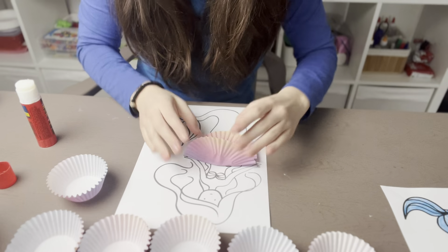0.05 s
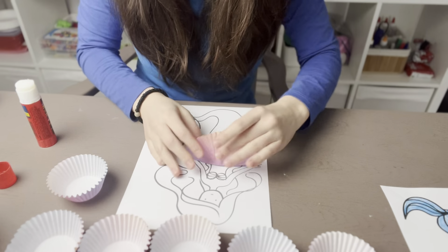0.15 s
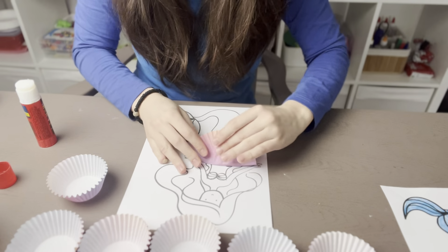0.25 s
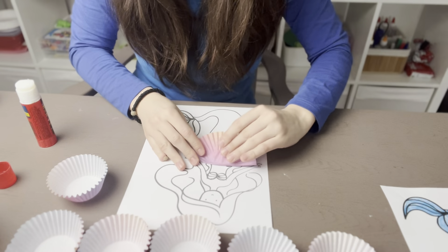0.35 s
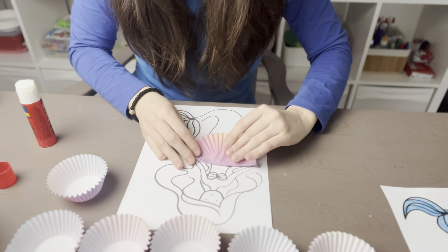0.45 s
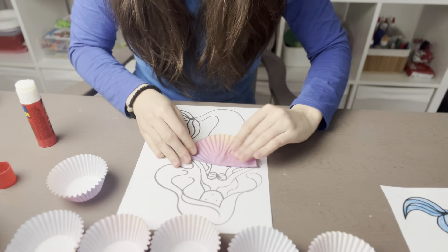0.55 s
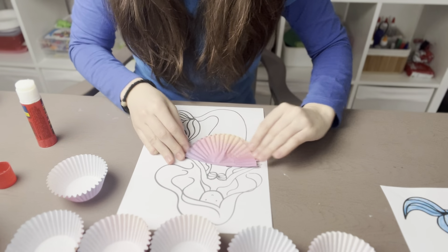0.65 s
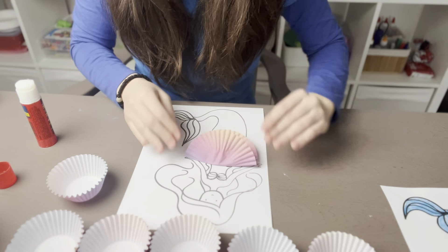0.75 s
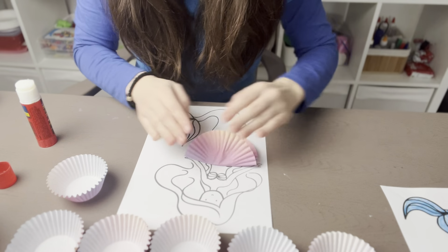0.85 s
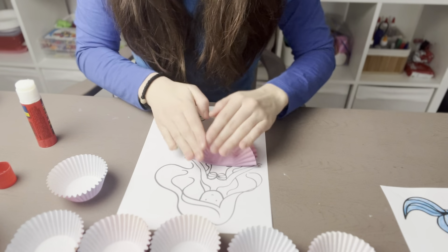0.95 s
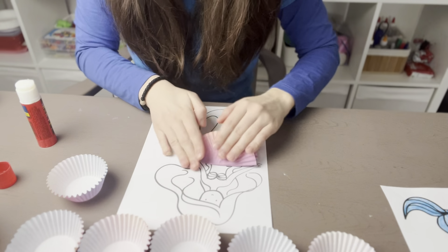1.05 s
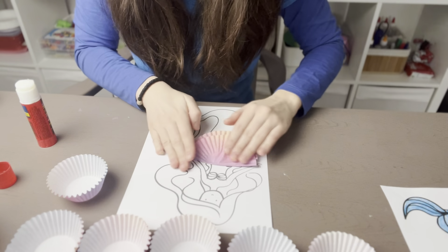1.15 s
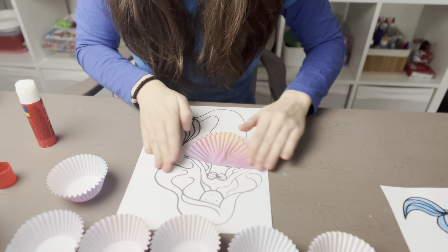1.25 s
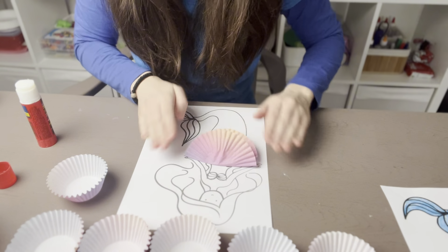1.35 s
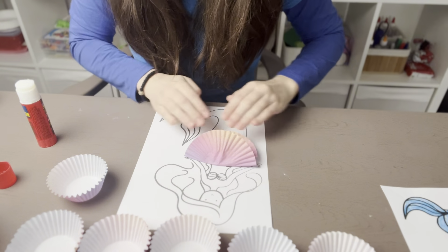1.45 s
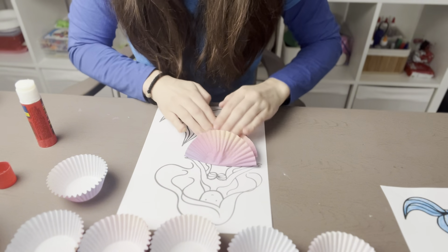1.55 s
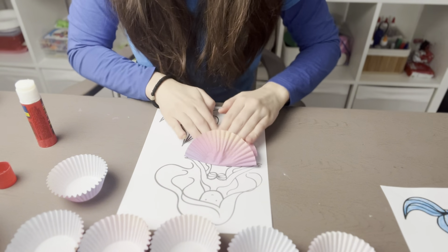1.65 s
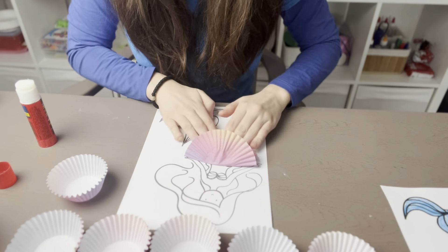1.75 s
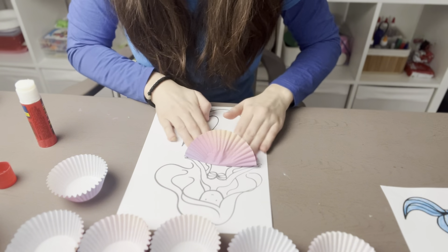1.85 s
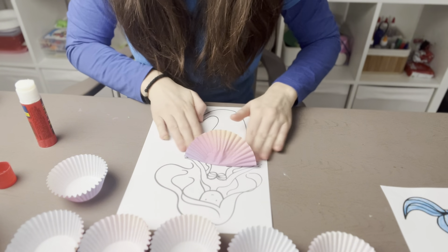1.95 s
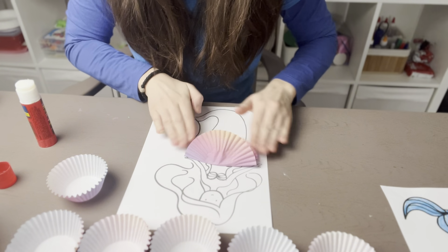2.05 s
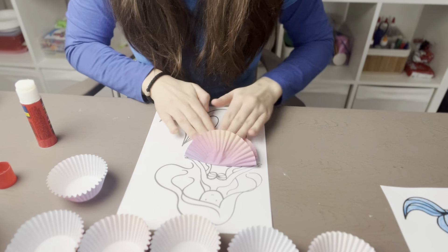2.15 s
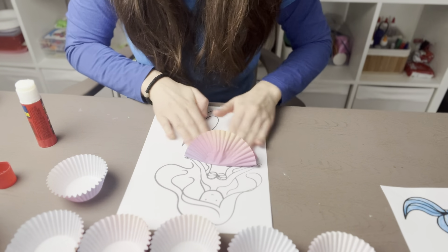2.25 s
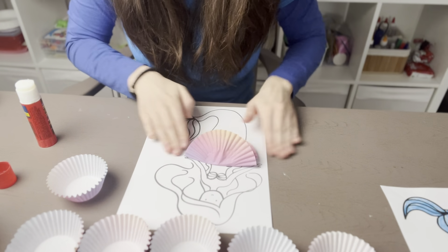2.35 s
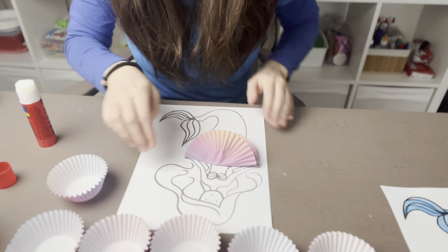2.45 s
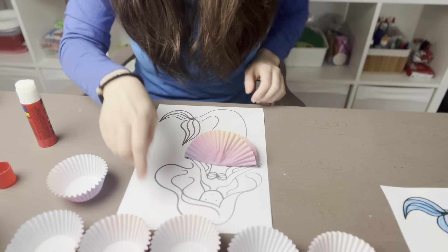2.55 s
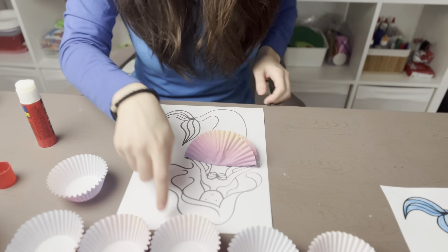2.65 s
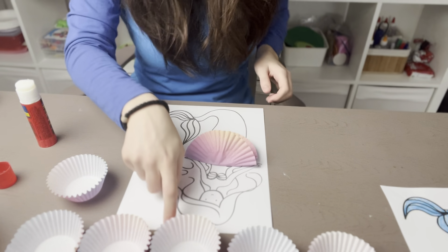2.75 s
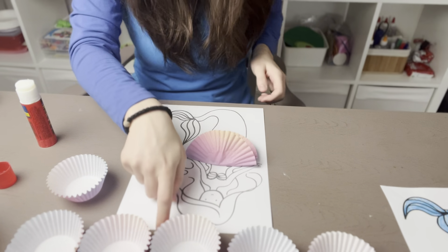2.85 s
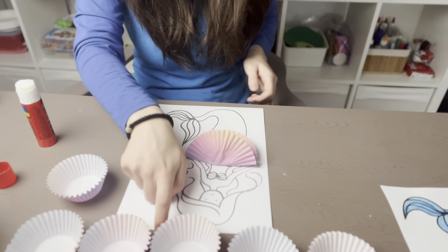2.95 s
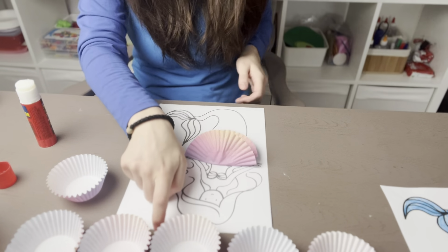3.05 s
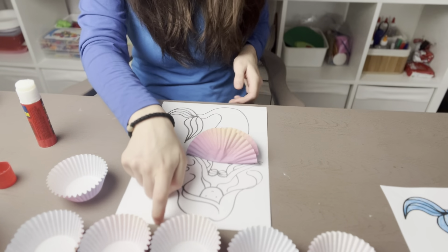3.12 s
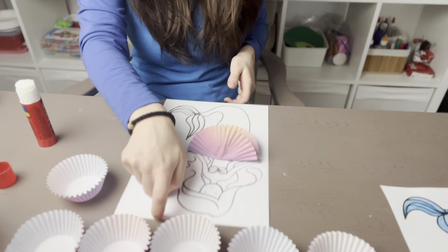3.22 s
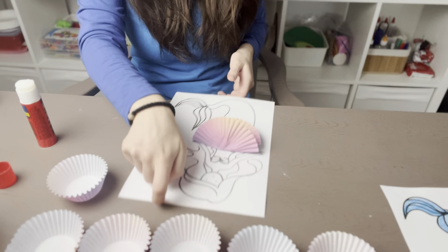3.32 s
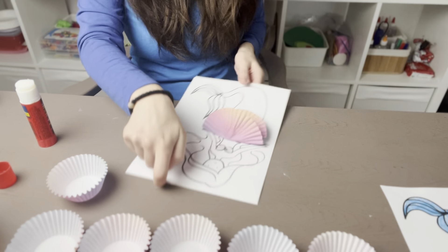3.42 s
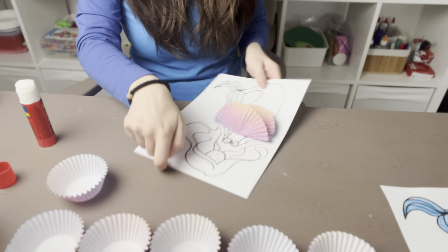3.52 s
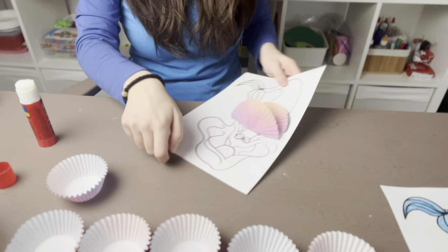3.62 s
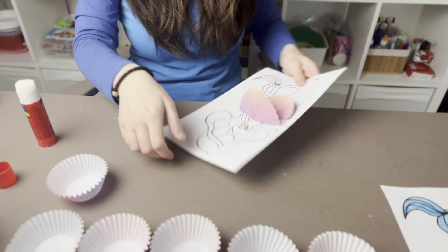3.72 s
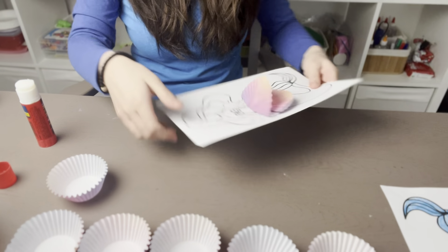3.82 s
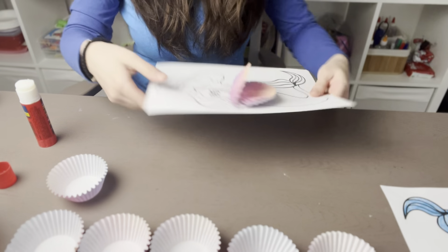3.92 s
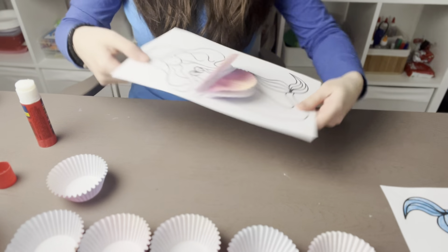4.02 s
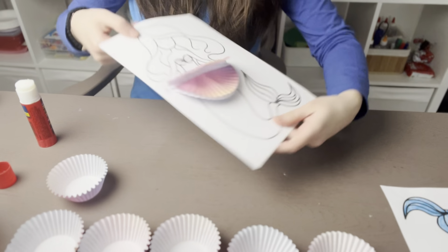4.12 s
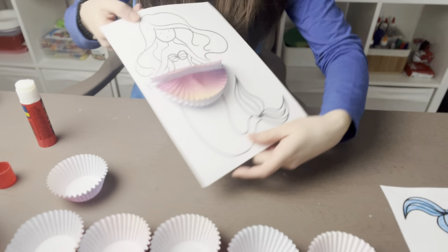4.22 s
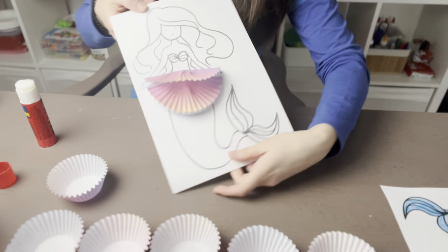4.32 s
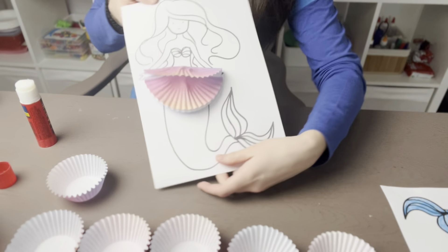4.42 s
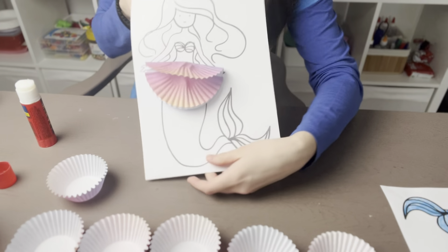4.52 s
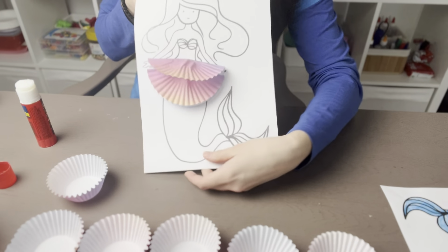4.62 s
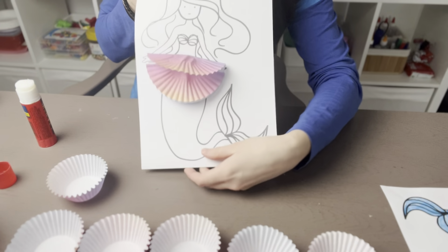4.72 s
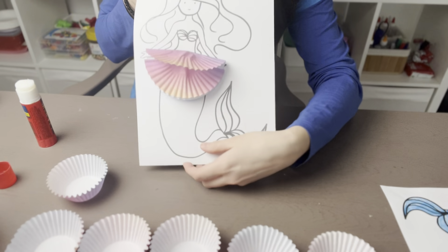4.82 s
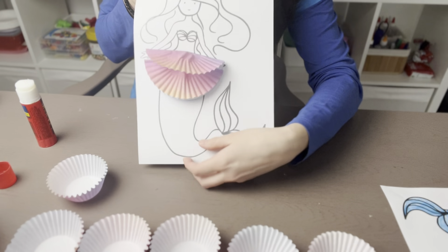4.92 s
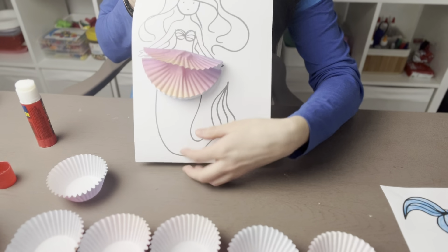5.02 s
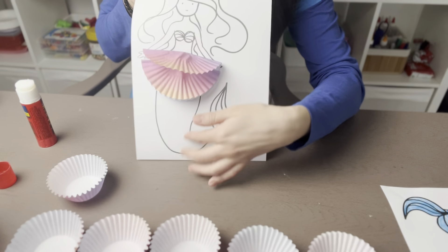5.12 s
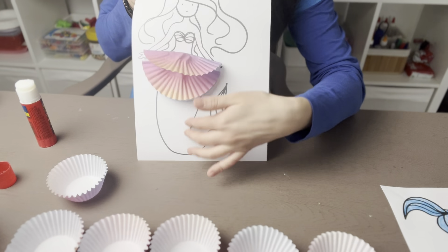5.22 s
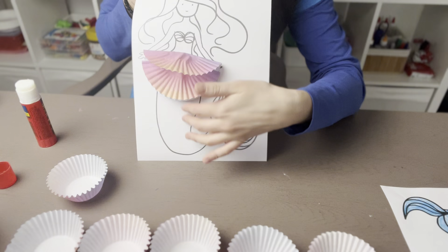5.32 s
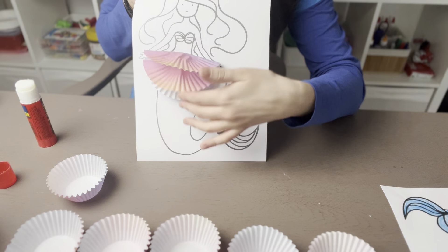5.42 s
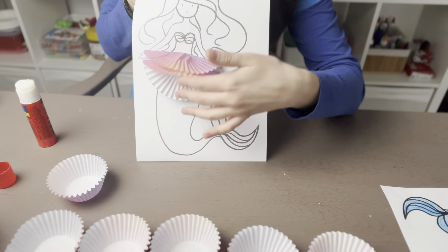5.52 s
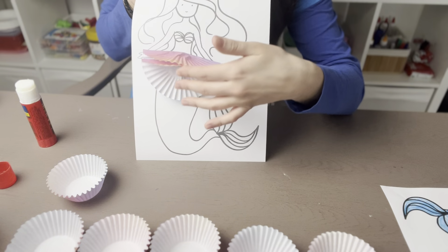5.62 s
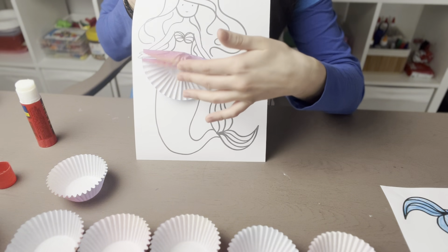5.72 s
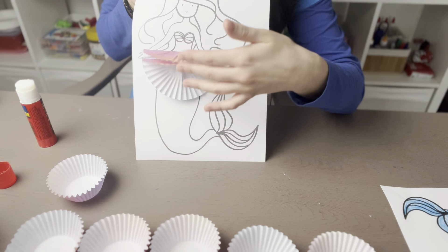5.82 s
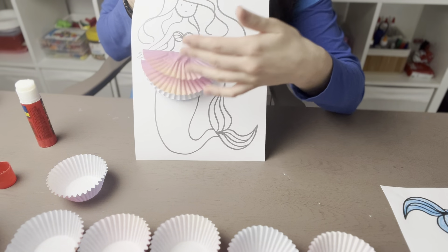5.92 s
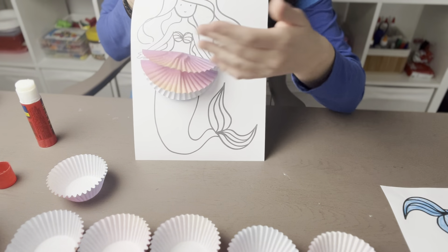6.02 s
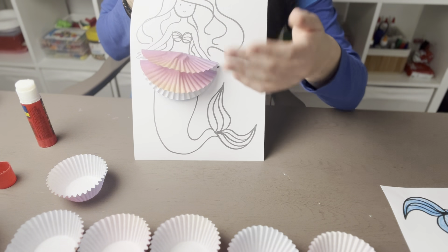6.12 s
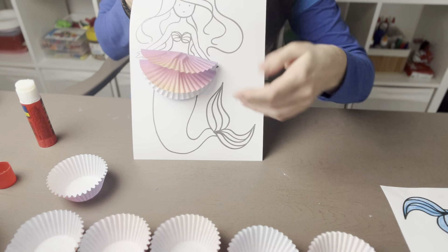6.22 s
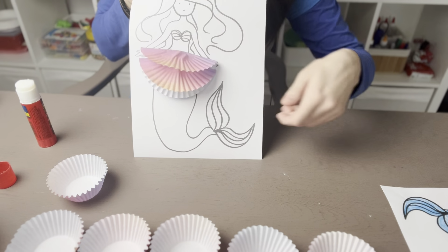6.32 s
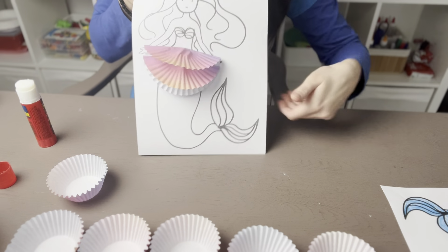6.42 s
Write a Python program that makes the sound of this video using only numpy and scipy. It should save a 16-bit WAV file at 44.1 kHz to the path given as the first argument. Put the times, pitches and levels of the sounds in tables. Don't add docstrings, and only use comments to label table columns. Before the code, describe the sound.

Crisp paper crackling under working fingers in a quiet room, a dull scrape over wood, faint flutter, one loud knock, then a few light rubs.

```python
import sys
import numpy as np
from scipy import signal
from scipy.fft import rfft, irfft, next_fast_len
from scipy.io import wavfile
from scipy.ndimage import uniform_filter1d, map_coordinates

SR = 44100
rng = np.random.default_rng(int(sys.argv[2]) if len(sys.argv) > 2 else 0)


def log_audio(samples):
    frames = np.atleast_2d(samples).T
    limited = np.clip(frames, -1, 1)
    pcm = np.round(limited * 32767).astype(np.int16)
    wavfile.write(sys.argv[1], SR, pcm)


def convert_level_to_amplitude(level_db):
    exponent = np.asarray(level_db, float) / 20
    return 10 ** exponent


N = 285050
GAIN_STEP = 32

# [f/Hz, level/dB per Hz]
AIR = [(53, -4.5), (90, -3.5), (145, -8), (165, -11.5), (244, -11.5), (360, -13), (606, -7.5),
       (1190, -20.5), (1410, -16.5), (2830, -16), (3830, -30), (4650, -29), (8000, -34), (16000, -36.5)]
# [f/Hz, correlation]
AIR_ALIKE = [(60, 0.64), (130, 0.04), (300, 0.32), (700, -0.63), (7000, 0.57), (15000, -0.1)]
AIR_DB = -68.5
# [f/Hz, level/dB per Hz]
RUMBLE = [(20, -26), (38, -6), (52, 1.5), (65, -4), (85, -18.5), (130, -31)]
# [t/s, length/s, first level/dB, last level/dB]
SURGES = [(0, 0.12, -57, -63), (.36, 0.28, -56, -59), (.8, 0.76, -63.5, -82.5), (1.75, 0.83, -78, -57),
          (2.73, 0.14, -63, -64.5), (3.05, 0.73, -67, -75), (4.2, 0.16, -64, -54), (4.57, 0.04, -60, -77),
          (4.78, 0.49, -52.5, -57.5), (5.12, 0.38, -76, -55.5), (5.93, 0.092, -57.5, -52),
          (6.25, 0.19, -61, -75)]
SURGE_GRIP_S, SURGE_FADE_DB_S = 0.1, 84
# [f/Hz, level/dB]
WHINE = [(560, -83), (2140, -89)]
# [t/s, length/s, first level/dB, last level/dB]
WHISTLES = [
    (0, 0.17, -82, -75),
    (.74, 0.12, -76, -81),
    (1.5, 0.18, -75.5, -69),
    (3.9, 1.7, -84, -86),
    (5.82, 0.35, -70.5, -81),
]
# [t/s, length/s, first level/dB, last level/dB]
OCTAVES = [
    (0.104, 0.65, -81, -72),
    (1.292, 1.37, -83, -78.5),
    (3.498, 3.8, -81.5, -78),
    (5.593, 0.57, -77, -73.5),
]
WHISTLE_HZ, WHISTLE_GRIP_S, WHISTLE_FADE_DB_S = 1443, 0.1, 198
# [t/s, length/s, first level/dB, last level/dB]
LEANS = [
    (.15, 1.8, -74.5, -85.5),
    (2.285, 0.26, -54, -75.5),
    (3.2, 0.21, -62.5, -58),
    (3.58, 0.16, -59.5, -56.5),
    (4.33, 0.48, -59, -69.5),
    (5.18, 0.015, -48, -56),
    (5.4, 0.043, -73, -56),
    (5.6, .05, -59.5, -64.5),
    (5.75, 0.63, -76, -86),
]
# [f/Hz, level/dB per Hz]
LEAN = [(70, -26), (95, 0.5), (130, 0), (170, -4.5), (240, -20.5)]
LEAN_GRIP_S, LEAN_FADE_DB_S = 0.05, 106

# [t/s, length/s, first level/dB, last level/dB, mid rasp over it/dB]
PRESSES = [(0, 0.011, -77, -76.5, 2), (0.153, 0.18, -68.5, -76, 2), (0.319, 0.12, -62, -58.5, 0.5),
           (0.475, 0.093, -57.5, -54, -7), (0.618, 0.034, -54, -54.5, -5.5), (0.963, 0.06, -73, -75, -15),
           (1.061, 0.092, -71, -58.5, -11), (1.184, 0.081, -53, -60.5, -7), (1.584, 0.11, -83, -66.5, 1),
           (1.724, 0.035, -74, -62, -15), (1.795, 0.049, -56.5, -58.5, -11), (1.863, 0.087, -65, -56, -26),
           (1.977, 0.013, -58.5, -60.5, -7.5), (2.128, 0.017, -89, -71, 4.5),
           (2.273, 0.014, -50.5, -55.5, -5), (2.337, 0.024, -49.5, -64, -11),
           (3.041, 0.055, -72, -63.5, -13), (3.235, 0.46, -54, -60.5, -2.5), (3.899, 0.18, -76, -62.5, 0),
           (4.118, 0.13, -65, -63.5, -5), (4.326, 0.24, -72, -69, 2.5), (4.576, 0.17, -99, -68.5, 2.5),
           (4.893, 0.11, -75, -64.5, 4.5), (5.164, 0.02, -67, -75, -22), (5.258, 0.073, -66.5, -72.5, -15),
           (5.48, 0.039, -76, -63, -10), (5.587, 0.26, -62.5, -72, -12), (5.723, 0.1, -63.5, -69.5, 2.5),
           (6.104, 0.23, -97, -78, 7), (6.373, 0.069, -76, -70.5, 0)]
PRESS_GRIP_S, PRESS_FADE_DB_S = 0.026, 133
# [t/s, length/s, first level/dB, last level/dB, mid rasp over it/dB]
SLIDES = [(0.136, 0.075, -61.5, -63.5, -20), (0.329, 0.11, -68, -57, -7), (0.421, .05, -59, -64, 0),
          (0.458, 0.26, -67.5, -67, -20), (0.959, 0.022, -61, -65.5, 1), (0.997, 0.037, -65, -65, -2),
          (1.044, 0.27, -63, -68, -1.5), (1.664, 0.031, -72, -68, -1), (1.73, .3, -74.5, -69.5, -1.5),
          (2.259, 0.014, -57.5, -66, -5), (2.338, 0.033, -53.5, -63.5, -9), (3.062, 0.064, -67, -36.5, -16),
          (3.141, 0.022, -47, -49.5, -27), (3.225, 0.037, -32, -41.5, -9.5),
          (3.287, 0.048, -42, -39.5, -11), (3.358, 0.043, -46, -43.5, -6.5),
          (3.436, 0.074, -55.5, -46, -6.5), (3.599, 0.16, -53.5, -67.5, -2), (3.719, 0.24, -57, -65.5, -6),
          (4.002, 0.39, -60.5, -78, -13), (4.322, 0.031, -67, -58.5, -28), (4.483, 0.078, -62, -53, -33),
          (4.918, 0.069, -78, -54, -7), (5.044, 0.0063, -68, -45, -31), (5.147, 0.1, -37, -53, -4.5),
          (5.292, 0.15, -53, -62.5, -6), (5.467, 0.025, -43.5, -49.5, -9), (5.582, 0.0096, -58, -49, -10),
          (5.676, 0.12, -70, -57, -22), (6.115, 0.22, -69.5, -67.5, -1), (6.386, 0.063, -71, -58.5, 4)]
SLIDE_GRIP_S, SLIDE_FADE_DB_S = 0.0094, 171.5
# [f/Hz, level/dB per Hz]
CRINKLE = [(1500, -30), (2500, -6), (4500, -2), (7000, 0), (8600, -.5), (10500, -3), (11800, -6),
           (12800, -9), (14500, -15), (15800, -17)]
LOW_SPLIT_HZ, LOW_FOLLOWS = 5400, 0.25
# [f/Hz, level/dB per Hz]
DRAG = [(130, -27.5), (220, 1), (400, 3.5), (800, 0.5), (1200, -39), (1800, -18)]
# [f/Hz, level/dB per Hz]
RASP = [(500, -3), (700, 4.5), (1000, 7.5), (1400, 5), (1750, 3), (2100, -1), (3500, -13), (6000, -24.5)]
# [f/Hz, width/Hz, level/dB]
TABLE = [(223, 11, 1.5), (307, 19, 1), (369, 144, -5), (436, 8, 4), (545, 59, -4), (730, 21, -5.5),
         (858, 2.5, 14), (950, 24, -26)]
# [t/s, peak level/dB, centre f/Hz, low body level/dB]
SNAPS_RIGHT = [(.123, -44, 6500, -32), (0.306, -38, 6100, -11), (.411, -35.5, 3240, 3.5),
               (0.4328, -33.5, 6840, 0.5), (0.479, -35, 4900, -16), (0.522, -31, 5370, -10),
               (.546, -48, 4000, -18), (0.6036, -32, 7000, -6), (0.6509, -22.5, 7200, -13),
               (0.956, -66, 2940, -13), (1.162, -24, 6700, -15), (1.1815, -38, 4870, -28),
               (1.0715, -49, 5030, -2), (1.2092, -42, 6900, 3), (1.2345, -32, 7340, -14),
               (1.2736, -34, 7500, -8), (1.2871, -37.5, 2400, -6), (1.8046, -34.5, 6600, -24),
               (2.0114, -27.5, 5400, -8.5), (2.336, -22.5, 6560, -12), (3.228, -35.5, 2240, 1.5),
               (3.9999, -49, 3580, 4), (4.558, -44, 4000, 0), (3.2207, -38, 5260, -11),
               (5.031, -42.5, 6030, -15), (5.053, -49.5, 6400, -7), (5.8692, -45, 5630, -8)]
# [t/s, peak level/dB, centre f/Hz, low body level/dB]
SNAPS_LEFT = [(0.1527, -37, 7560, -32), (0.6438, -26, 7350, -7), (1.1694, -24.5, 2940, -13.5),
              (1.6858, -47, 7060, 6), (1.796, -33, 8000, -12), (1.8128, -32.5, 7200, -13),
              (1.8584, -39.5, 3050, -5), (1.925, -42, 4200, -19), (1.955, -51.5, 2500, 0),
              (1.9958, -27.5, 7650, -29), (2.27, -31.5, 7250, 0), (2.2756, -21, 7940, -28),
              (2.2772, -30, 3030, -6), (2.307, -43, 1900, 5.5), (2.3165, -26, 7000, -25),
              (2.3429, -35, 3060, -3), (2.351, -42, 3080, -5), (3.1307, -38.5, 2500, -3.5),
              (3.147, -41, 2750, -10), (3.244, -46, 3900, 1), (5.105, -44, 5460, 7),
              (5.169, -39, 6400, -28), (5.179, -62, 3400, -18), (5.2015, -46, 7040, -21),
              (5.2985, -51, 5740, -17), (5.372, -42, 6760, -20), (5.4083, -33.5, 6700, -13),
              (5.4315, -36, 2100, 1.5), (5.4736, -33, 6600, -14), (5.531, -24, 7300, -45),
              (5.569, -44, 6200, -17), (5.7245, -48, 7400, -23), (5.7439, -41, 4530, -0.5),
              (5.839, -39.5, 5170, 1)]
RIGHT_PAN_DB, LEFT_PAN_DB = -5, 2
# [t/s, peak level/dB, f/Hz, t60/s]
BUMPS = [(0.151, -51, 1050, 0.072), (0.41, -32.5, 1200, 0.017), (0.433, -41.5, 1030, 0.048),
         (0.956, -55, 870, 0.083), (0.962, -55, 1245, .05), (1.003, -50, 1150, .04),
         (1.004, -48.5, 394, 0.11), (1.815, -47, 1080, .04), (2.286, -52.5, 206, 0.052),
         (3.073, -41.5, 322, 0.054), (3.099, -38, 350, .05), (3.109, -37, 418, 0.062),
         (3.127, -29, 436, 0.055), (3.136, -33, 417, 0.029), (3.146, -37, 350, 0.045),
         (3.157, -34, 470, 0.034), (3.17, -40, 480, .08), (3.2, -39, 522, 0.079), (3.2228, -33, 860, 0.07),
         (3.228, -30.5, 311.5, .12), (3.2265, -32.5, 1450, .03), (3.252, -32, 327, 0.068),
         (3.285, -40, 795, 0.061), (3.36, -41, 403, .05), (3.378, -38, 330, 0.059),
         (3.472, -42, 330, 0.044), (3.227, -33, 859, 0.2), (3.245, -52, 865, 0.12), (3.305, -34, 350, .06),
         (3.328, -34, 336, 0.072), (3.729, -40, 220, 0.022), (3.752, -46, 380, 0.12),
         (4.334, -43, 307, 0.074), (4.0, -48, 605, 0.03), (4.515, -42.5, 392, 0.035),
         (4.556, -39.5, 419, 0.058), (5.049, -44, 600, 0.036), (5.059, -33, 325, 0.046),
         (5.067, -41, 380, 0.052), (5.107, -44, 450, .03), (5.158, -36, 1100, 0.018),
         (5.167, -30, 420, 0.037), (5.179, -31, 560, .025), (5.201, -34, 396, 0.026),
         (5.473, -39, 330, 0.038), (5.484, -38, 600, 0.036), (5.49, -38.5, 590, 0.042),
         (5.594, -48, 430, 0.074), (6.148, -57.5, 955, 0.057)]
# [t/s, rise/s, fall/s, level/dB, centre f/Hz]
SKIDS = [(0.602, 0.0011, 0.0059, -47, 3180), (0.621, 0.0068, 0.023, -48, 7200),
         (.957, .001, 0.0096, -57, 4840), (1.182, 0.0015, 0.0018, -34, 4900),
         (1.93, 0.0046, .008, -56, 6500), (5.371, .001, .005, -48.5, 6400),
         (5.3868, 0.0024, .002, -39, 5950), (5.393, 0.0022, 0.0026, -37, 5960),
         (5.399, .001, 0.0036, -47, 5500), (5.41, 0.0011, 0.0057, -50, 5960),
         (5.871, .001, 0.0047, -46.5, 5500), (5.884, .001, 0.0027, -60, 4800),
         (5.752, 0.0026, .003, -54, 4800), (5.299, 0.0017, 0.0049, -51, 5800),
         (.33, .004, 0.011, -59.5, 7500), (1.075, 0.0033, 0.0064, -53.5, 5000),
         (1.21, .002, 0.0037, -55, 7000), (3.935, 0.025, 0.016, -62, 5400), (.645, .001, 0.0035, -44, 2500),
         (4.564, 0.0022, .004, -59, 4500), (4.582, .002, .004, -59, 6200),
         (5.478, 0.0033, 0.022, -44, 5750), (5.731, 0.0092, 0.0041, -43.5, 7200),
         (5.746, 0.002, 0.0074, -60, 3500), (5.84, 0.011, 0.0026, -41, 5800)]
SKID_WIDTH = 0.25

TAP_S, TAP_DB = 5.1457, -8.5
# [t/s, peak level/dB, pitch over the tap/ratio]
LIGHT_TAPS = [
    (3.7183, -32, 0.66),
    (5.4319, -28.5, 0.885),
]
# [f/Hz, level/dB, t60/s]
WOOD = [(224, -27, 0.11), (350, -22, 0.042), (510, -14, 0.048), (1050, -7, 0.015), (1350, -28.5, 0.037)]
# [t/s, length/s, first level/dB, last level/dB, first f/Hz, last f/Hz, width/Hz]
SWINGS = [
    (4.018, 0.51, -62, -68.5, 5240, 3800, 603),
    (6.39, 0.076, -73, -47, 1450, 1500, 350),
]

# [f/Hz, t60/s]
WALLS = [(200, 1), (800, 0.62), (3000, 0.73), (10000, 0.33)]
ECHO_TOP_HZ = 2600
# [f/Hz, level/dB]
CENTRE = [(5000, 0), (7200, -3), (8700, -5), (10000, -15), (13000, -12), (14200, 1), (15500, 4)]
# [t/s, length/s]
OPEN = [(.41, .03), (.475, .03), (.645, .05), (1.07, .025), (1.175, .015), (1.295, .05), (1.815, .04),
        (2.005, .04), (2.26, .05), (2.335, .035), (4.7, .02), (4.83, .02), (5.1, .025), (5.36, .05),
        (5.53, .015), (5.72, .06), (5.835, .03)]


def unit(x):
    return x / np.sqrt(np.mean(x ** 2) + 1e-20)


def along(points, hz):
    f, v = np.transpose(points)
    return np.interp(np.log(hz + 1), np.log(f + 1), v, left=v[0], right=v[-1])


def wobble(rate):
    return map_coordinates(rng.standard_normal(int(N * rate / SR) + 4), [np.arange(N) * rate / SR])


def filtered(x, response):
    m = next_fast_len(N + SR // 2)
    return irfft(rfft(x, m) * response(np.fft.rfftfreq(m, 1 / SR)), m)[..., :N]


def ports(x, lag_s, pan_db):
    half = np.array([[.5], [-.5]])
    return filtered(x[None], lambda hz: convert_level_to_amplitude(pan_db * half) * np.exp(-2j * np.pi * hz * lag_s * half))


def strokes(rows, grip_s, fade_db_s):
    t = np.arange(0, N, GAIN_STEP) / SR
    gains = []
    for s, span, first_db, last_db, *_ in rows:
        drift = np.interp(t, [s, s + span], [first_db, last_db])
        grip = 20 * np.minimum(t - s, 0) / grip_s
        fade = fade_db_s * np.maximum(t - s - span, 0)
        gains.append(convert_level_to_amplitude(drift + grip - fade))
    return np.array(gains)


def joined(gains):
    return np.interp(np.arange(N), np.arange(0, N, GAIN_STEP), np.sqrt(np.sum(gains ** 2, 0)))


def patchy(x, depth_db):
    z = signal.stft(x, nperseg=512)[2]
    field = uniform_filter1d(uniform_filter1d(rng.standard_normal(z.shape[1:]), 12, 0), 12, 1)
    field = field - field[20:120].mean(0)
    return unit(signal.istft(z * convert_level_to_amplitude(depth_db * unit(field)), nperseg=512)[1][:, :N])


def background():
    surge = joined(strokes(SURGES, SURGE_GRIP_S, SURGE_FADE_DB_S))
    weight = joined(strokes(LEANS, LEAN_GRIP_S, LEAN_FADE_DB_S))
    whistle = joined(strokes(WHISTLES, WHISTLE_GRIP_S, WHISTLE_FADE_DB_S))
    octave = joined(strokes(OCTAVES, WHISTLE_GRIP_S, WHISTLE_FADE_DB_S))

    angle = lambda hz: np.arccos(np.clip(along(AIR_ALIKE, hz), -1, 1)) / 2
    pair = rng.standard_normal((2, N))
    mid, side = filtered(pair, lambda hz: convert_level_to_amplitude(along(AIR, hz)) * np.array([np.cos(angle(hz)), np.sin(angle(hz))]))
    air = convert_level_to_amplitude(AIR_DB + 4.0 + 0.26 * wobble(4.9)) * unit(np.array([mid + side, mid - side]))
    rumble = unit(filtered(rng.standard_normal(N), lambda hz: convert_level_to_amplitude(along(RUMBLE, hz)) * (hz < 140)))

    t = np.arange(N) / SR
    lines = 0
    for hz, db in WHINE:
        lines = lines + convert_level_to_amplitude(db + 2.2 * wobble(4.7)) * np.sin(2 * np.pi * hz * t + 0.62 * wobble(18))
    phase = 2 * np.pi * WHISTLE_HZ * t + 0.24 * wobble(13)
    lines = lines + whistle * np.sin(phase) + octave * np.sin(2 * phase)

    lean = unit(filtered(rng.standard_normal(N), lambda hz: convert_level_to_amplitude(along(LEAN, hz)) * (hz < 260)))
    air = np.sqrt(np.mean(air ** 2)) * patchy(air, depth_db=1.5)
    low = (surge + convert_level_to_amplitude(-82.0)) * rumble + weight * lean
    return air + low * convert_level_to_amplitude([[-.9], [.9]]) + lines * convert_level_to_amplitude([[1.5], [-3]])


def scratch(spectrum, grain_db, clump_db, lag_s, pan_db, spread):
    slips = convert_level_to_amplitude(grain_db * wobble(350) + clump_db * wobble(28))
    colour = lambda hz: convert_level_to_amplitude(along(spectrum, hz))
    direct = ports(unit(filtered(slips * rng.standard_normal(N), colour)), lag_s, pan_db)
    scattered = unit(filtered(slips * rng.standard_normal((2, N)), colour))
    return np.sqrt(1 - spread) * direct + np.sqrt(spread) * scattered


def table_top(f):
    return 0.5 + sum(convert_level_to_amplitude(db) * 1j * f * w / (c * c - f * f + 1j * f * w) for c, w, db in TABLE)


def rubbing():
    press = strokes(PRESSES, PRESS_GRIP_S, PRESS_FADE_DB_S)
    slide = strokes(SLIDES, SLIDE_GRIP_S, SLIDE_FADE_DB_S)
    scrape = joined(np.vstack([press, slide]) * convert_level_to_amplitude([[row[-1]] for row in PRESSES + SLIDES]))

    crinkle = scratch(CRINKLE, grain_db=1.5, clump_db=.6, lag_s=92e-6, pan_db=0, spread=.36)
    crinkle = patchy(crinkle, depth_db=2.0)
    drag = scratch(DRAG, grain_db=2, clump_db=1.5, lag_s=30e-6, pan_db=-6, spread=0.19)
    drag = unit(filtered(drag, table_top))
    rasp = scratch(RASP, grain_db=1.8, clump_db=.8, lag_s=70e-6, pan_db=-3, spread=0.4)

    low = filtered(crinkle, lambda hz: 1 / (1 + (hz / LOW_SPLIT_HZ) ** 6))
    low_gain = joined(press * convert_level_to_amplitude([[LOW_FOLLOWS * (row[-1] + 8)] for row in PRESSES]))
    pleats = convert_level_to_amplitude(10.5) * (joined(press) * (crinkle - low) + low_gain * low)
    return pleats + skidding(crinkle) + convert_level_to_amplitude(-2.0) * joined(slide) * drag + scrape * rasp


def snaps():
    out, t = np.zeros((2, N + SR)), np.arange(SR // 40) / SR
    low = signal.butter(2, [400, 2000], "band", fs=SR)
    burst = (t / .0005) * np.exp(1 - t / .0005)
    shape = burst + .4 * convert_level_to_amplitude(-60 * t / .012) + .1 * convert_level_to_amplitude(-60 * t / .03)
    rows = [(*row, RIGHT_PAN_DB) for row in SNAPS_RIGHT] + [(*row, LEFT_PAN_DB) for row in SNAPS_LEFT]
    for s, db, hz, body_db, pan_db in rows:
        noise = rng.standard_normal((4, len(t)))
        crack = noise[0] + 1.9 * noise[1:3]
        own = signal.butter(2, [hz * .85, hz * 1.18], "band", fs=SR)
        high = signal.butter(3, [hz * .6, 11500], "band", fs=SR)
        ring = signal.lfilter(*own, crack) + .3 * signal.lfilter(*high, crack)
        ring = shape * ring / np.abs(shape * ring).max()
        pop = convert_level_to_amplitude(body_db - 1.0) * signal.lfilter(*low, noise[3])
        snap = convert_level_to_amplitude(db + 2.5) * (ring + shape ** 0.51 * pop)
        out[:, round(s * SR):][:, :len(t)] += snap * convert_level_to_amplitude([[pan_db / 4], [-pan_db / 4]])
    late = filtered(out[0, :N], lambda hz: np.exp(-2j * np.pi * hz * 92e-6))
    return np.array([late, out[1, :N]])


def knocks():
    out, t = np.zeros(N + SR), np.arange(SR // 3) / SR
    low = signal.butter(3, [150, 1200], "band", fs=SR)
    for s, db, hz, t60 in BUMPS:
        thud = np.sin(2 * np.pi * hz * t) + 0.89 * signal.lfilter(*low, rng.standard_normal(len(t)))
        decay = convert_level_to_amplitude(db - 1 - 60 * t / min(t60, .25))
        out[round(s * SR):][:len(t)] += decay * (1 - np.exp(-t / .001)) * thud
    for s, db, pitch in [(TAP_S, TAP_DB, 1)] + LIGHT_TAPS:
        out[round(s * SR):][:len(t)] += convert_level_to_amplitude(db) * tap(t, pitch)
    return ports(out[:N], lag_s=5e-6, pan_db=-3.0)


def skidding(noise):
    out, t = np.zeros((2, N)), np.arange(-SR // 20, SR // 10) / SR
    f = np.fft.rfftfreq(len(t), 1 / SR) + 1
    for s, rise, fall, db, hz in SKIDS:
        at = slice(round(s * SR) - SR // 20, round(s * SR) + SR // 10)
        colour = .3 + np.exp(-(np.log(f / hz) / SKID_WIDTH) ** 2)
        hiss = unit(irfft(rfft(noise[:, at]) * colour, len(t)))
        swell = np.exp(-(np.minimum(t, 0) / rise) ** 2 - (np.maximum(t, 0) / fall) ** 2)
        out[:, at] += convert_level_to_amplitude(db) * swell * hiss
    return out


def tap(t, pitch):
    cycles = pitch * (260 * t + 880 * .002 * (1 - np.exp(-t / .002)))
    bend = (1 - np.exp(-(t / .001) ** 2)) * np.exp(-t * pitch / .002) * np.sin(2 * np.pi * cycles)
    ring = sum(convert_level_to_amplitude(db - 60 * t / t60) * np.sin(2 * np.pi * hz * pitch * t) for hz, db, t60 in WOOD)
    card = .6 * np.sin(2 * np.pi * 3600 * t) + np.sin(2 * np.pi * 2300 * t)
    tick = convert_level_to_amplitude(-20 - 60 * t / .004) * card
    return 1.5 * bend + ring * (1 - np.exp(-t / .0007)) + pitch ** 2 * tick


def swing():
    out = 0
    for row in SWINGS:
        s, span, _, _, first_hz, last_hz, width_hz = row
        hz, t, z = signal.stft(rng.standard_normal((2, N)), SR, nperseg=512)
        centre = first_hz + (last_hz - first_hz) * np.sqrt(np.clip((t - s) / span, 0, 1))
        centre = centre * (1 + .05 * np.interp(t, np.arange(N) / SR, wobble(14)))
        resonance = np.exp(-((hz[:, None] - centre) / width_hz) ** 2)
        hiss = signal.istft(z * resonance, SR, nperseg=512)[1][:, :N]
        hiss = hiss * convert_level_to_amplitude(3 * wobble(18))
        out = out + joined(strokes([row], grip_s=0.086, fade_db_s=200)) * unit(hiss)
    return out


def room(x):
    hz, t, z = signal.stft(rng.standard_normal((2, SR // 2)), SR, nperseg=256)
    tail = signal.istft(z * convert_level_to_amplitude(-60 * t / along(WALLS, hz)[:, None]), SR, nperseg=256)[1]
    late = np.pad(x, (250, 0))[None]
    return signal.fftconvolve(late, tail / np.linalg.norm(tail[0]), axes=1)[:, :N]


def scene():
    folds, wood = snaps(), knocks()
    dull = filtered(wood[1], lambda hz: 1 / (1 + 1j * hz / ECHO_TOP_HZ) ** 3)
    echoes = convert_level_to_amplitude(-10) * room(folds[1]) + convert_level_to_amplitude(-10.0) * room(dull)
    return folds + wood + echoes + rubbing() + background() + swing()


def starve(x, lo_hz, hi_hz, keep):
    hz, t, z = signal.stft(x, SR, nperseg=1024)
    bins = np.flatnonzero((hz > lo_hz) & (hz < hi_hz))
    for block in np.array_split(bins, max(1, round((hi_hz - lo_hz) / 330))):
        level = 10 * np.log10(np.mean(abs(z[block]) ** 2, 0) + 1e-20)
        z[block] *= keep(level + rng.normal(0, 5, len(t)), t)
    return signal.istft(z, SR, nperseg=1024)[1][:N]


def roll_off(x):
    return signal.sosfilt(signal.butter(12, 16790, fs=SR, output="sos"), x)


def record(dry):
    mid = filtered((dry[0] + dry[1]) / 2, lambda hz: convert_level_to_amplitude(along(CENTRE, hz)))
    side = (dry[0] - dry[1]) / 2
    is_open = lambda db, t: sum(abs(t - s) < span / 2 + .003 for s, span in OPEN) > 0
    mid = starve(mid, 9100, 9600, lambda db, t: db > -84)
    mid = starve(mid, 9600, 13700, is_open)
    mid = starve(mid, 13700, 16000, lambda db, t: (db > -100) & (abs(t - TAP_S - .05) > .07))
    side = starve(side, 13500, 14700, lambda db, t: db > -108)
    side = starve(side, 14700, 16000, lambda db, t: db > -87)
    mix = filtered(np.array([mid + side, mid - side]), lambda hz: hz < 15900)
    return roll_off(mix)


dry = scene()
out = record(dry)
log_audio(out)
```